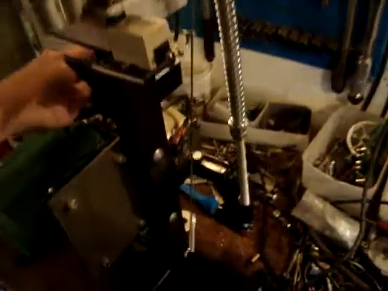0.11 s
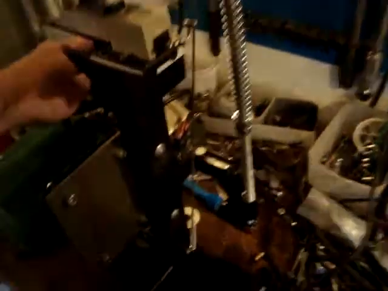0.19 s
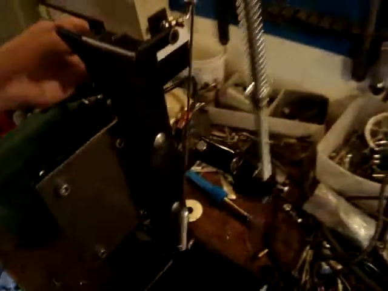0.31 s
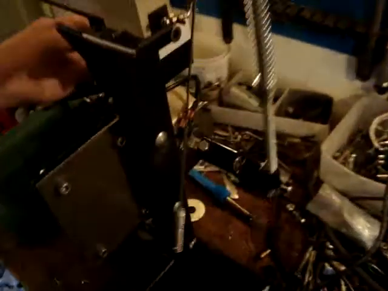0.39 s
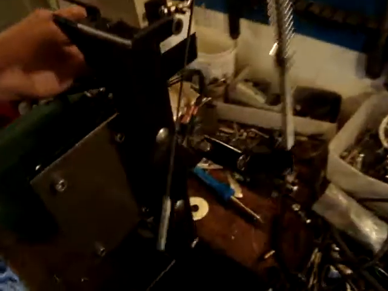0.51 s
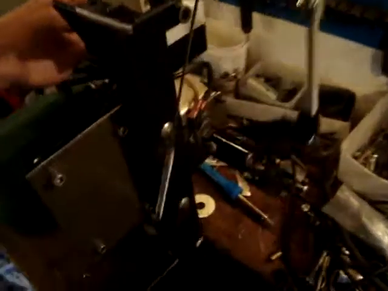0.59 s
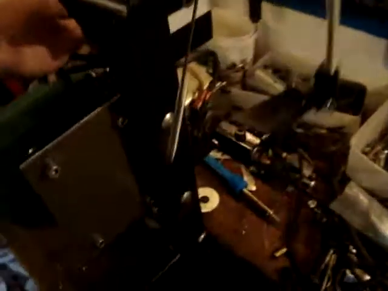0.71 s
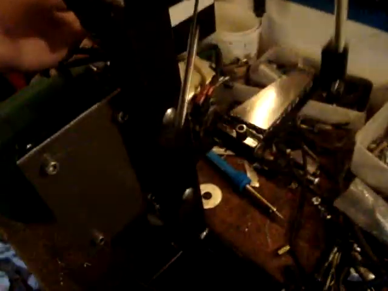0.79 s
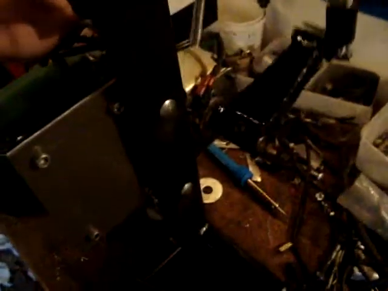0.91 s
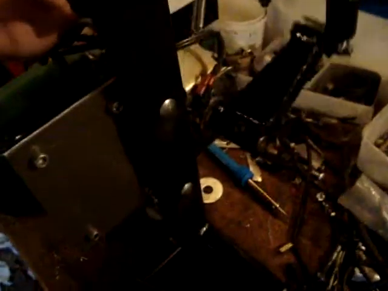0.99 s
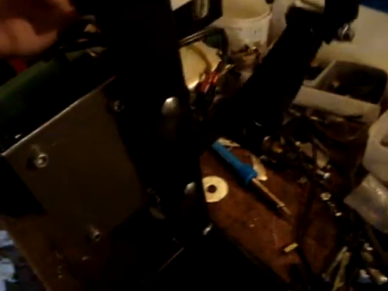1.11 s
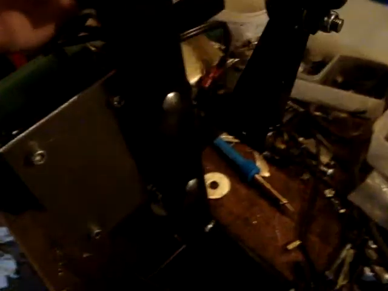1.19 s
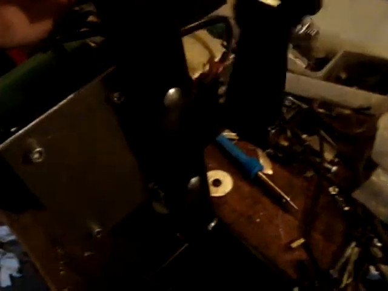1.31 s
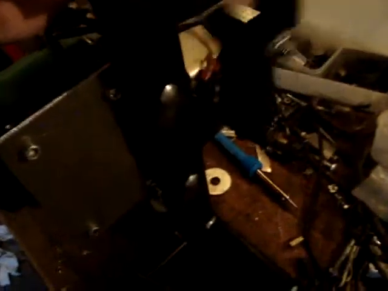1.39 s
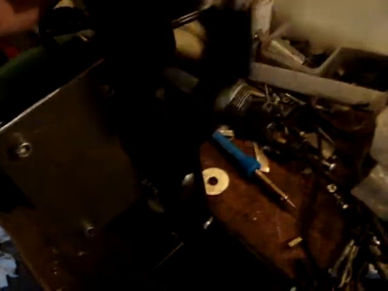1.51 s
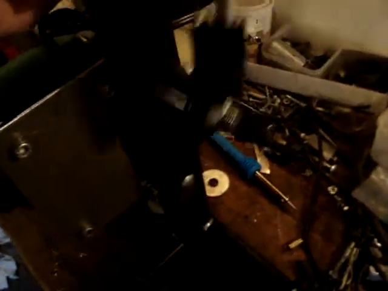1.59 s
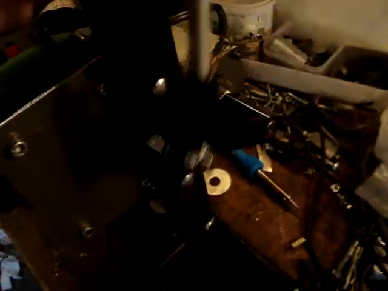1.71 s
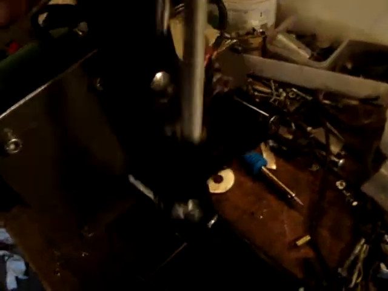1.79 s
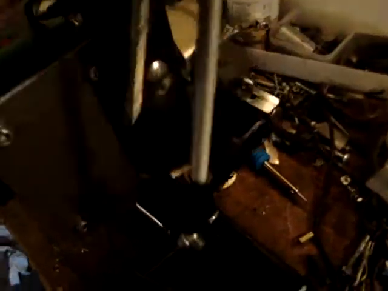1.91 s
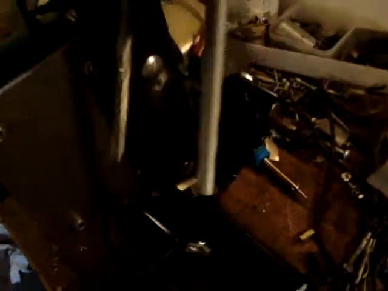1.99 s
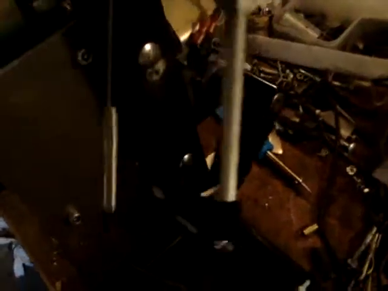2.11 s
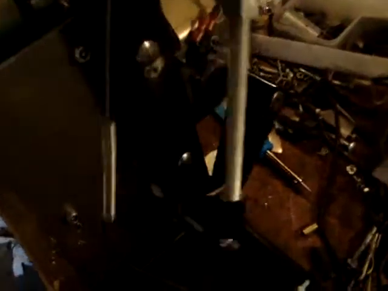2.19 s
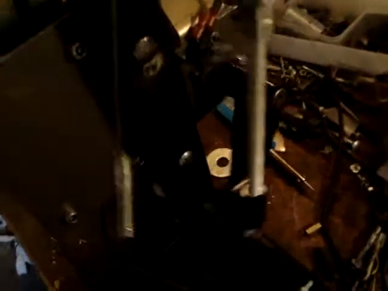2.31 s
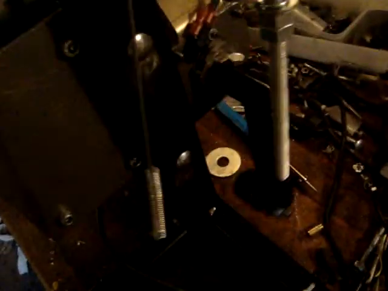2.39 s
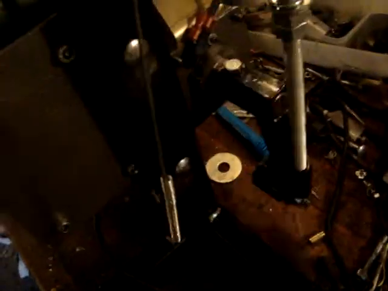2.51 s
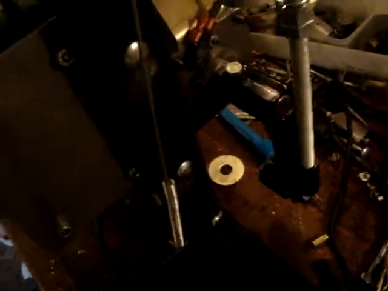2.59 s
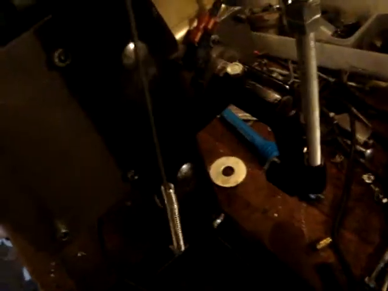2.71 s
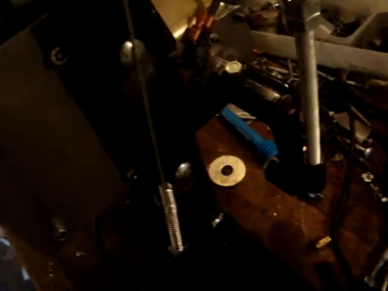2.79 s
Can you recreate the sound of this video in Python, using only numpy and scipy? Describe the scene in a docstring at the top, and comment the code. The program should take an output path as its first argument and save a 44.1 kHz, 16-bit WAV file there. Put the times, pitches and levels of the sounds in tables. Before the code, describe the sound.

A small electric press in a workshop starts with a click, whirrs and growls with rapid gear knocks, clacks and scrapes mid-stroke, runs more quietly, then clicks off and coasts down; close phone pickup.

```python
"""A small electric metal press in a workshop: the motor starts, drives one stroke and coasts to rest.
Rough gear teeth make the gearbox whirr and growl; their backlash knocks once or twice a turn in the housing.
Shaft orders and mains hum drone below, as sine waves; the slide scrapes in stick-slip grains of noise.
Links click as ringing bursts of noise and the bench thumps at a low pitch, over a faint room hiss.
The room answers with a short tail of noise, and the phone that listens cuts the top."""
import sys
import numpy as np
from scipy import signal
from scipy.fft import rfft, irfft
from scipy.io import wavfile
from scipy.ndimage import uniform_filter1d, map_coordinates

SR = 44100
rng = np.random.default_rng(int(sys.argv[2]) if len(sys.argv) > 2 else 0)


def to_wav(sig):
    """Store sig (one row per channel, or 1-D mono) as 16-bit WAV at the path in sys.argv[1].

    Samples outside -1..1 are clipped; the rate is SR.
    """
    pcm = np.clip(np.atleast_2d(sig), -1, 1) * 32767
    pcm = np.round(pcm).astype(np.int16)
    wavfile.write(sys.argv[1], SR, pcm.T)  # frames by channels


N = 123480
T = np.arange(N) / SR
POWER_OFF_S = 2.475
SILENT_DB = -120  # level outside a table's span

# shaft speed: start_s, speed_turns_per_s
SPEED = [(.22, 8), (.36, 24.5), (.95, 24.5), (1.0, 25.05), (1.3, 25.05), (1.35, 24.2), (1.78, 24.2),
         (1.82, 24.55), (2.47, 24.55), (2.8, 6)]
# housing resonances: centre_hz, width_hz, whirr_db, knock_db (relative levels)
HOUSING = [(882.7, 71, -4, 0.5), (940.6, 34, 1, 1), (1117, 81, -7.5, -16.5), (1344, 193, 1, -9.5),
           (1715, 172, -2, -18), (2052, 87, 6.5, -7), (2180, 295, -3, -15), (3058, 45, 4.5, -31),
           (3980, 67, -39, -25), (5030, 440, -9, -31)]


def amp(db):
    """Decibels to amplitude."""
    return 10 ** (np.asarray(db) / 20)


def unit(x):
    """Scale to an RMS of 1."""
    return x / np.sqrt(np.mean(x ** 2))


def curve(rows, order=1, off=None):
    """Column of a table along time; off is the value outside it."""
    rows = np.array(rows)
    return np.interp(T, rows[:, 0], rows[:, order], left=off, right=off)


def level(rows, order=1):
    """A level column along time in dB, silent outside the table."""
    return curve(rows, order, SILENT_DB)


def colour(x, spectrum):
    """Shape a sound by (Hz, dB) points, joined along log frequency, to an RMS of 1."""
    hz, db = np.array(spectrum).T
    f = np.arange(N // 2 + 1) * SR / N + 1  # 1 Hz up, to keep the logarithm finite
    gain = amp(np.interp(np.log(f), np.log(hz), db))
    return unit(irfft(rfft(x) * gain, N))


def ring(x, hz, width_hz):
    """One resonance, gain 1 at its centre."""
    return signal.lfilter(*signal.iirpeak(hz, hz / width_hz, SR), x)


def walk(rate):
    """Smooth random wander through rate new values a second, spread 1."""
    k = int(SR / rate)
    steps = np.repeat(rng.standard_normal(N // k + 1), k)
    return unit(uniform_filter1d(steps, k)[:N])


def spikes(times, db):
    """Impulses at given times."""
    out = np.zeros(N)
    np.add.at(out, (np.asarray(times) * SR).astype(int), amp(db))
    return out


def hiss():
    """Steady room hiss: noise with a shaped spectrum."""
    # spectrum: tone_hz, density_db_per_hz (relative)
    hiss_tone = [(18, -68.5), (30, -40), (216, -14), (250, -12.5), (312, -8.5), (560, -6), (1600, -12.5),
                 (5680, -19.5), (10200, -23.5), (13300, -65.5), (22000, -120)]
    return colour(rng.standard_normal(N), hiss_tone) * amp(-56.5)


def whine(hz, width_hz):
    """A thin line that wavers at random in level and phase: a carrier on slow noise."""
    smoothing = np.exp(-np.pi * width_hz / SR)
    lean = signal.lfilter([1], [1, -smoothing], rng.standard_normal((2, N)))
    phase = 2 * np.pi * np.cumsum(hz + 0 * T) / SR
    return unit(lean[0] * np.cos(phase) + lean[1] * np.sin(phase))


def whirr(turns):
    """Tooth roughness, partly the same every turn, flutters and rings the housing; thin mesh whines are added."""
    # gearbox, before throb and trims: start_s, whirr_db, growl_db
    gears = [(.215, -70, -40), (.225, -34.5, -45), (.3, -42, -24.5), (.36, -32.5, -30), (.55, -33, -25.5),
             (.75, -31, -26), (.97, -32.5, -25.5), (1.03, -27, -20.5), (1.25, -37, -29), (1.4, -36, -35.5),
             (1.52, -39.5, -27.5), (1.56, -38, -29), (1.77, -39.5, -35.5), (1.83, -37.5, -40.5),
             (2.1, -37, -29.5), (2.4, -36, -26.5), (2.5, -42, -33), (2.56, -53.5, -37.5), (2.63, -60, -43),
             (2.68, -74, -52), (2.78, -92, -80)]
    # broad whirr: tone_hz, density_db_per_hz (relative)
    whirr_tone = [(59, -86.5), (100, -39), (605, -11), (891, -4), (1440, -15.5), (2090, -10.5), (2680, -13),
                  (3070, -10.5), (10200, -28.5), (13300, -86.5), (22000, -120)]
    # gear mesh whines: start_s, lower_hz, lower_db (before the throb), upper_db
    mesh_lines = [(.3, 2080, -55, -60), (.35, 2080, -34, -60), (.5, 2150, -38.5, -68),
                  (.7, 2165, -33, -42.5), (.97, 2165, -32, -41.5), (1.1, 2170, -52, -50),
                  (1.25, 2170, -43, -36.5), (1.4, 2160, -35, -37.5), (1.43, 2160, -40, -47),
                  (1.52, 2160, -34, -46), (1.545, 2100, -43, -56), (1.8, 2085, -47, -62),
                  (2.1, 2085, -52, -48), (2.25, 2075, -60, -47.5), (2.45, 2070, -38, -53),
                  (2.55, 2050, -49.5, -71), (2.67, 2040, -62, -80)]
    # loudest angle of the growl: start_s, angle_turns (from the zero of turns)
    loud_angle = [(.4, -.12), (.97, -.15), (1.02, .15), (2.45, .15)]
    # under load the second housing resonance sings out: start_s, gain_db
    loaded = [(.95, -2.5), (1.03, 1.5), (1.25, 6), (1.35, 0)]
    repeat_share, flutter_per_s, own_flutter_db, flutter_db = .38, 110, 2, 3
    throb_depth_db, engage_s = 4, .3
    growl_trim_db, whirr_trim_db, broad_db = -6, .5, -2

    # one turn's roughness, read again on every turn
    size = 1800
    tooth_map = rng.standard_normal(size)
    same = map_coordinates(tooth_map, [turns % 1 * size], order=1, mode="grid-wrap")
    same = signal.lfilter(*signal.butter(2, 1500, fs=SR), same)
    rough = repeat_share * same + (1 - repeat_share) * rng.standard_normal(N)

    modes = []
    for k, (hz, width_hz, db, _) in enumerate(HOUSING):
        fluttering = rough * amp(own_flutter_db * walk(flutter_per_s))
        modes.append((-1) ** k * amp(db) * ring(fluttering, hz, width_hz))
    broad = colour(rough * amp(flutter_db * walk(flutter_per_s)), whirr_tone)

    # growl and lower whine swell once a turn while the motor drives
    running = (T > engage_s) & (T < POWER_OFF_S)
    throb_db = throb_depth_db * np.cos(2 * np.pi * (turns - curve(loud_angle))) * running
    growl = unit(modes[0] + modes[1] * amp(curve(loaded)) + modes[2])
    growl = growl * amp(level(gears, 2) + growl_trim_db + throb_db)
    lower = whine(curve(mesh_lines), 27) * amp(level(mesh_lines, 2) + throb_db)
    upper = whine(3095, 36) * amp(level(mesh_lines, 3))
    high = unit(sum(modes[3:])) + amp(broad_db) * broad
    return growl + lower + upper + high * amp(level(gears) + whirr_trim_db)


def scrape():
    """Dense stick-slip grains into the slide, whose resonances light up in streaks; lows and highs chatter apart."""
    # one list for each bout of scraping, before the trim: start_s, level_db
    bouts = [
        [(0.216, -75), (0.22, -59), (0.226, -36), (0.242, -66), (0.278, -30.5), (0.29, -79), (0.3, -66)],
        [(0.985, -56), (0.997, -27.5), (1.061, -25.5), (1.149, -34.5), (1.169, -25.5), (1.411, -39),
         (1.447, -61), (1.459, -29.5), (1.477, -54), (1.547, -30), (1.665, -30.5), (1.675, -29), (1.697, -26.5),
         (1.727, -33.5), (1.737, -25.5), (1.785, -39)],
        [(2.41, -48), (2.418, -60), (2.43, -32), (2.442, -53), (2.45, -33.5), (2.484, -61), (2.5, -67)],
    ]
    # broad scrape: tone_hz, density_db_per_hz (relative)
    scrape_tone = [(120, -45), (200, -47), (317, -15), (622, -15.5), (939, -4), (1460, -11.5), (2100, -17),
                   (2520, -10.5), (6870, -12.5), (10200, -19.5), (13300, -74), (22000, -120)]
    # slide resonances: centre_hz, width_hz, level_db (relative)
    slide = [(1299, 29, 4), (1720, 82, 7.5), (2030, 53, 7.5), (2332, 34, 2), (2500, 6.2, -6),
             (2945, 130, 10.5), (4127, 61, 1.5), (4830, 32, 6), (6350, 67, -19), (7000, 500, -32)]
    grains_per_s, grain_db, grain_energy_ms = 2500, 3.5, 1
    chatter_per_s, chatter_db, treble_chatter_db, streak_db = 90, 1.5, 3, 3.5
    slide_db, trim_db = -3, 1

    strength = amp(grain_db * np.minimum(rng.exponential(size=N), 2))
    slips = rng.standard_normal(N) * strength * (rng.random(N) < grains_per_s / SR)
    # each slip's energy dies away and carries fresh noise
    fade = np.exp(-1000 / grain_energy_ms / SR)
    energy = signal.lfilter([1], [1, -fade], slips ** 2)
    grains = np.sqrt(energy) * rng.standard_normal(N)

    body = np.zeros(N)
    for k, (hz, width_hz, db) in enumerate(slide):
        streaks = grains * amp(streak_db * walk(chatter_per_s / 2))
        # the root evens out the energy of narrow and wide resonances
        body += (-1) ** k * amp(db) * np.sqrt(100 / width_hz) * ring(streaks, hz, width_hz)
    sound = colour(grains, scrape_tone) + amp(slide_db) * unit(body)

    low = signal.filtfilt(*signal.butter(2, 5500, fs=SR), sound)
    high = sound - low
    low = low * amp(chatter_db * walk(chatter_per_s))
    high = high * amp(treble_chatter_db * walk(chatter_per_s))
    return (low + high) * sum(amp(level(rows)) for rows in bouts) * amp(trim_db)


def drone(turns):
    """Clean shaft orders, each wavering in level, and mains lines."""
    # drone: start_s, shaft_orders_db, mains_hum_db (gains on the two tables below)
    drone_level = [(0.22, -56, -54), (0.32, -47, -49), (0.54, -46, -62), (0.82, -43.5, -51),
                   (1.01, -42.5, -73), (1.05, -55, -70), (1.14, -51, -82), (1.27, -56.5, -90),
                   (1.74, -56.5, -86), (1.78, -62, -62), (1.81, -60, -68), (2.34, -54, -49),
                   (2.64, -52.5, -101), (2.7, -72, -89)]
    # shaft orders: multiple_of_shaft_speed, level_db (relative)
    shaft_orders = [(1, -43), (2, -25), (3, -36), (4, -17), (5, -15), (6, -16), (7, -15), (9, -8),
                    (10, -13), (11, -11), (13, -10), (14, -13), (15, -13), (16, -8), (17, -7), (18, -7),
                    (19, -10), (20, -8), (21, -15), (22, -11), (23, -8), (24, -8), (25, -8), (26, -13),
                    (27, -5), (28, -7), (29, -9)]
    # mains lines: line_hz, level_db (relative)
    mains = [(100, -8), (200, -8)]
    # levels of the eighth and twelfth shaft orders, rising and falling as they beat with the mains hum:
    # start_s, eighth_db, twelfth_db
    beating_orders = [(0.3, -72, -64), (0.34, -50.5, -46), (0.42, -60, -73), (0.45, -51, -52),
                      (0.56, -58.5, -40.5), (0.77, -42.5, -49), (0.84, -61, -59), (0.93, -50.5, -37),
                      (1.02, -49, -47), (1.04, -58, -47), (1.42, -75, -63), (1.45, -54, -44),
                      (1.53, -65.5, -62), (1.96, -66.5, -76), (2.2, -59, -60), (2.25, -53.5, -53),
                      (2.45, -63, -59), (2.6, -68, -78)]
    waver_db, waver_per_s = 5, 16
    start = rng.random(len(shaft_orders) + len(mains)) * 2 * np.pi

    shaft = np.zeros(N)
    for (k, db), phase in zip(shaft_orders, start):
        wavering = amp(db + waver_db * walk(waver_per_s))
        shaft += wavering * np.sin(2 * np.pi * k * turns + phase)
    hum = np.zeros(N)
    for (hz, db), phase in zip(mains, start[::-1]):
        wavering = amp(db + waver_db / 2 * walk(waver_per_s))
        hum += wavering * np.sin(2 * np.pi * hz * T + phase)

    # shaft level is set by orders 9 to 18, and drops steeply with speed
    low = np.sqrt(sum(amp(db) ** 2 / 2 for k, db in shaft_orders if 8 < k < 19))
    speed = curve(SPEED)
    shaft = shaft / low * (speed / speed.max()) ** 5
    beating = np.zeros(N)
    for column, k in ((1, 8), (2, 12)):
        beating += np.sqrt(2) * amp(level(beating_orders, column)) * np.sin(2 * np.pi * k * turns)
    return beating + shaft * amp(level(drone_level)) + hum * amp(level(drone_level, 2))


def clicks():
    """Metal on metal: a crack of noise, and the link modes near the centre of the blow ring."""
    # link clicks: start_s, level_db (before the trim), centre_hz, t60_s
    blows = [(0.2214, -21, 1720, 0.031), (0.3191, -13, 5140, 0.024), (0.6983, -21.5, 2100, 0.024),
             (0.737, -28, 2280, 0.03), (0.9961, -11.5, 2100, 0.024), (1.4566, -37, 2080, 0.022),
             (1.4914, -25, 2170, 0.018), (1.5054, -17, 2020, 0.022), (1.5236, -13, 5000, 0.012),
             (1.5867, -18.5, 3470, 0.019), (1.6737, -9, 6660, 0.021), (1.676, -20, 6900, 0.023),
             (1.693, -19, 4180, 0.012), (1.7374, -20, 2740, 0.025), (1.874, -25.5, 5950, 0.037),
             (2.155, -26, 2060, 0.022), (2.425, -20, 3080, 0.039), (2.4453, -18.5, 3120, 0.049)]
    # what the links ring with: mode_hz, level_db (relative)
    link_modes = [(1870, -28.5), (2130, -8), (2740, -15), (3080, 25), (3450, 4.5), (4150, -5.5), (4470, 6),
                  (5400, 6.5), (6030, 15), (6780, 0), (7400, -36)]
    reach_octaves, crack_db, trim_db, rise_ms = .34, 1, -4.5, 1.2
    out, t = np.zeros(N), T[:SR // 10]
    for s, db, hz, t60 in blows:
        noise = rng.standard_normal(len(t))
        modes = np.zeros(len(t))
        for f, mode_db in link_modes:
            nearness = np.exp(-(np.log2(f / hz) / reach_octaves) ** 2)
            modes += amp(mode_db) * nearness * ring(noise, f, 220)
        crack = amp(crack_db) * ring(noise, 3600, 5400)
        envelope = amp(db + trim_db - 60 * t / t60) * (1 - np.exp(-t * 1000 / rise_ms))
        at = int(s * SR)
        out[at:at + len(t)] += (unit(modes) + crack) * envelope
    return out


def thumps():
    """The bench takes the jolts: a low sine that builds and dies quickly."""
    # bench thumps: start_s, strength_db (relative)
    jolts = [(.33, -56), (1.0, -34), (1.29, -54), (1.55, -53), (1.735, -43), (2.43, -58)]
    thump_hz, fade_t60_s = 70, .029
    t = T[:SR // 5]
    thud = t * thump_hz * np.sin(2 * np.pi * thump_hz * t) * amp(-60 * t / fade_t60_s)
    return signal.fftconvolve(spikes(*np.array(jolts).T), thud)[:N]


def shudder(length_ms, tune, treble_db):
    """One knock: a brief shudder of the housing that rings on softly, peak 1."""
    after_ring_db = -9
    t = T[:SR // 15]
    u = t * 1000 / length_ms
    shape = np.zeros(len(t))
    for (hz, width_hz, _, db), k in zip(HOUSING, tune):
        blow = (1 - np.exp(-4 * u)) * np.exp(-u * u)
        after = amp(after_ring_db) * (1 - np.exp(-u)) * np.exp(-np.pi * width_hz * t)
        gain = amp(db + treble_db * (hz > 1500))
        shape += gain * np.sin(2 * np.pi * hz * k * t) * (blow + after)
    return shape / np.abs(shape).max()


def knocks():
    """Gear backlash strikes the housing, each knock slightly retuned; with the power off, longer and duller."""
    # backlash knocks in the gearbox: start_s, peak_db (before the trim)
    backlash = [(0.338, -22), (0.373, -17), (0.39, -34), (0.431, -19), (0.455, -17.5), (0.47, -15),
                (0.507, -22.5), (0.536, -12.5), (0.551, -14.5), (0.582, -20), (0.622, -19), (0.635, -26),
                (0.659, -21), (0.674, -16), (0.701, -23), (0.715, -14.5), (0.741, -10.5), (0.756, -17.5),
                (0.782, -26), (0.796, -19), (0.823, -18), (0.835, -27), (0.863, -14.5), (0.879, -16),
                (0.903, -19.5), (0.92, -20.5), (0.945, -18), (0.961, -18), (0.986, -21), (1.009, -10.5),
                (1.036, -18.5), (1.049, -18.5), (1.08, -19), (1.145, -15.5), (1.16, -18), (1.215, -14),
                (1.246, -24), (1.286, -13), (1.321, -19), (1.362, -21), (1.403, -21), (1.445, -15.5),
                (1.487, -17), (1.516, -26), (1.543, -14.5), (1.571, -33), (1.613, -17), (1.655, -16.5),
                (1.694, -14), (1.737, -22.5), (1.778, -30), (1.816, -29.5), (1.832, -28), (1.859, -23),
                (1.872, -22.5), (1.896, -27.5), (1.94, -24), (1.981, -18.5), (2.004, -24), (2.024, -29),
                (2.033, -21), (2.063, -19), (2.102, -18), (2.114, -32), (2.143, -21), (2.155, -26),
                (2.184, -22), (2.197, -30), (2.224, -16), (2.265, -26), (2.307, -15.5), (2.318, -17.5),
                (2.347, -14.5), (2.358, -22), (2.386, -20), (2.398, -24), (2.428, -39), (2.452, -17),
                (2.468, -22.5), (2.481, -24), (2.513, -29), (2.529, -22), (2.544, -29), (2.561, -35),
                (2.586, -34), (2.613, -36), (2.673, -40), (2.689, -45), (2.754, -51)]
    trim_db, detune = -1, .018  # detune: spread as a fraction of each pitch
    out = np.zeros(N + SR)
    tunes = 1 + detune * rng.standard_normal((len(backlash), len(HOUSING)))
    for (s, db), tune in zip(backlash, tunes):
        length_ms, treble_db = (11, -10) if s > POWER_OFF_S else (5, 0)
        one = shudder(length_ms, tune, treble_db)
        at = int(s * SR)
        out[at:at + len(one)] += amp(db + trim_db) * one
    return out[:N]


def room(press):
    """The workshop's answer: a fading tail of noise that begins 4 ms after the direct sound."""
    t60_s, room_db = .11, -13
    t = T[:SR // 2]
    tail = rng.standard_normal(len(t)) * amp(-60 * t / t60_s) * (t > .004)
    tail = tail / np.sqrt(np.sum(tail ** 2))
    return amp(room_db) * signal.fftconvolve(press, tail)[:N]


def scene():
    """The press, its room and the hiss; the whirr and drone follow one shaft angle."""
    turns = np.cumsum(curve(SPEED)) / SR
    turns = turns - turns[int(2.1 * SR)]  # angle zero at 2.1 s
    press = whirr(turns) + scrape() + drone(turns) + clicks() + thumps() + knocks()
    return (press + room(press) + hiss())[None]


def record(dry):
    """The phone cuts the top: a steep low-pass just above 10 kHz."""
    top_hz = 10020
    return signal.sosfilt(signal.ellip(10, .2, 70, top_hz, fs=SR, output="sos"), dry)


dry = scene()
out = record(dry)
to_wav(out)
```